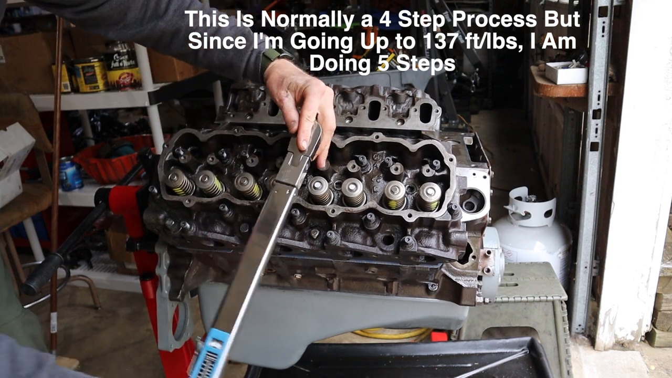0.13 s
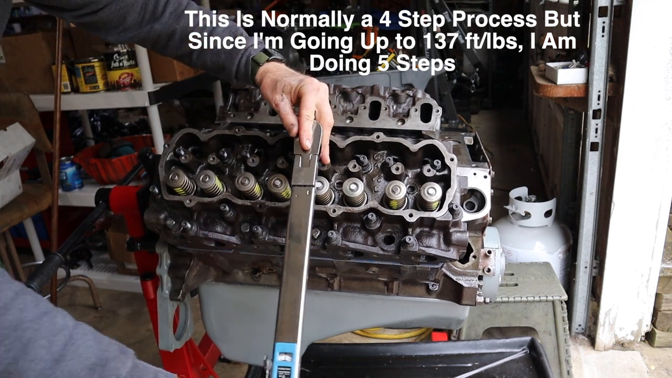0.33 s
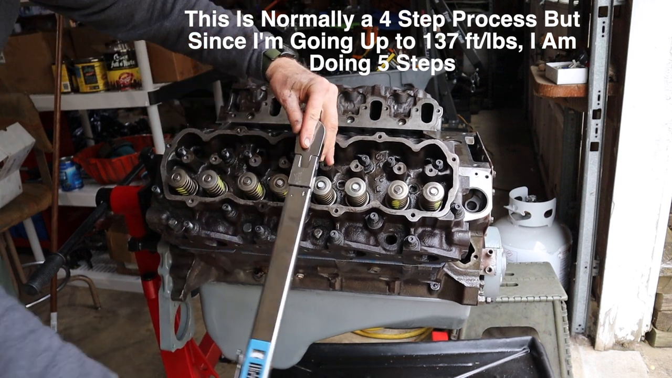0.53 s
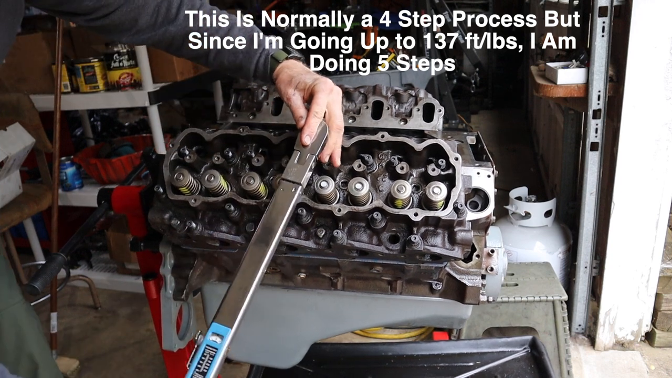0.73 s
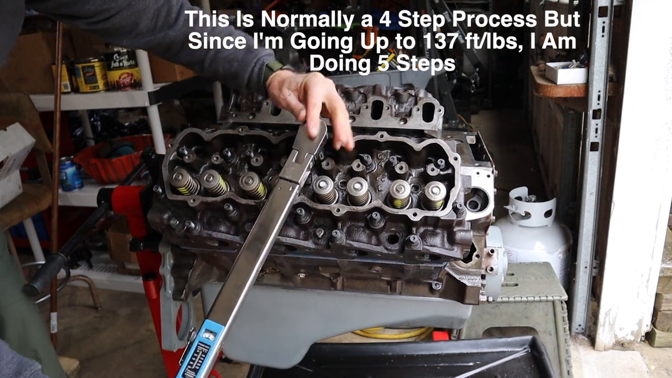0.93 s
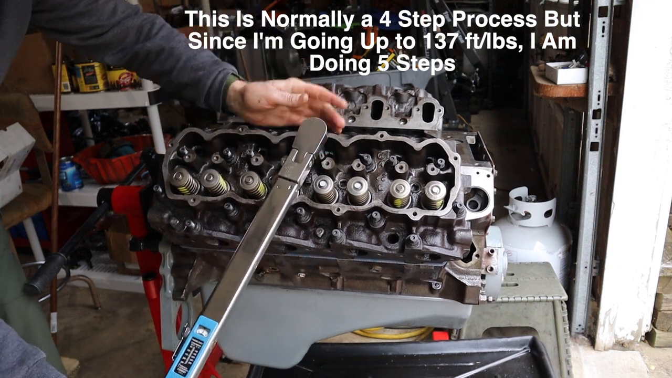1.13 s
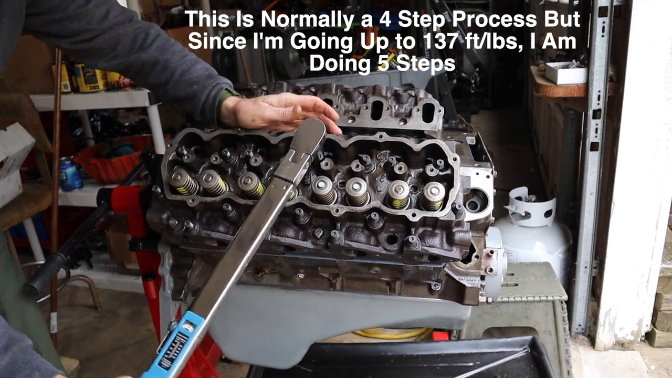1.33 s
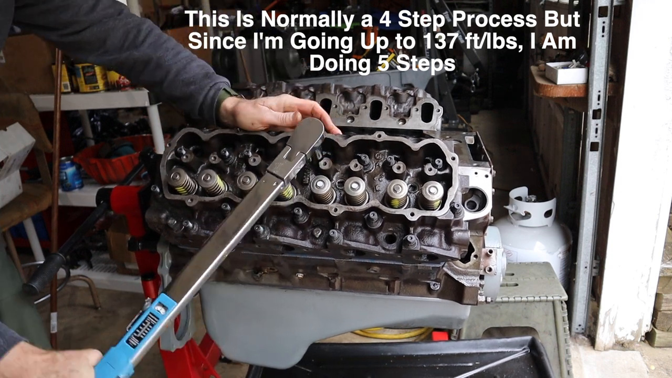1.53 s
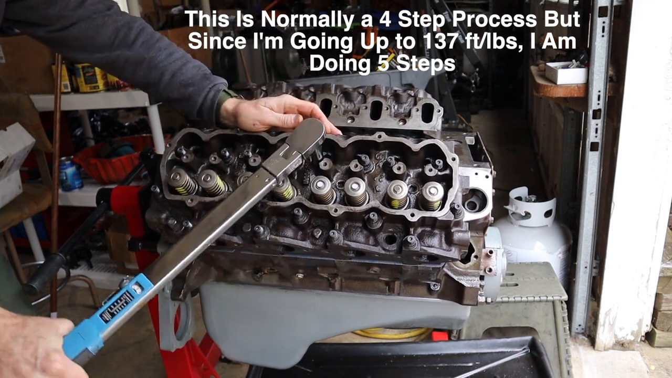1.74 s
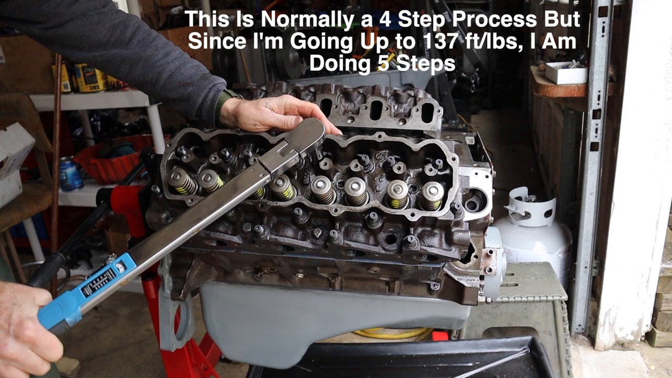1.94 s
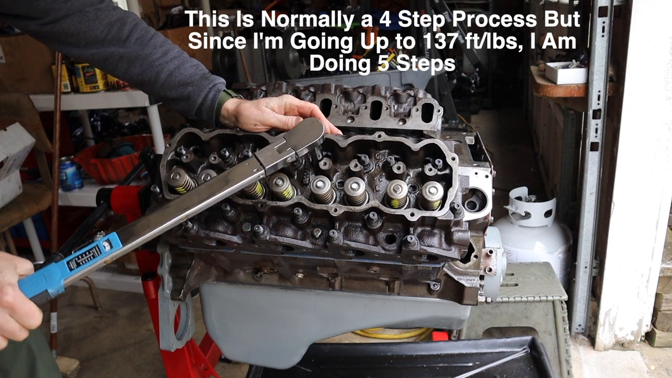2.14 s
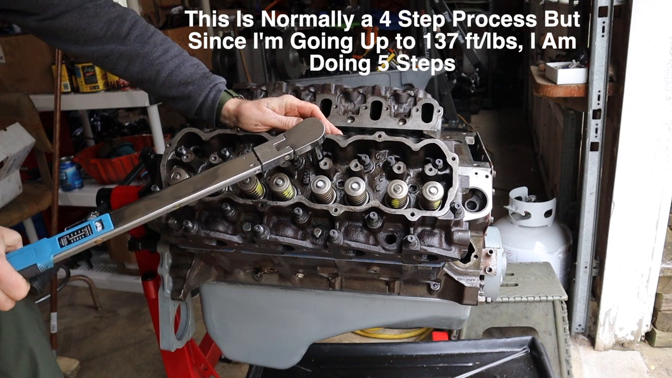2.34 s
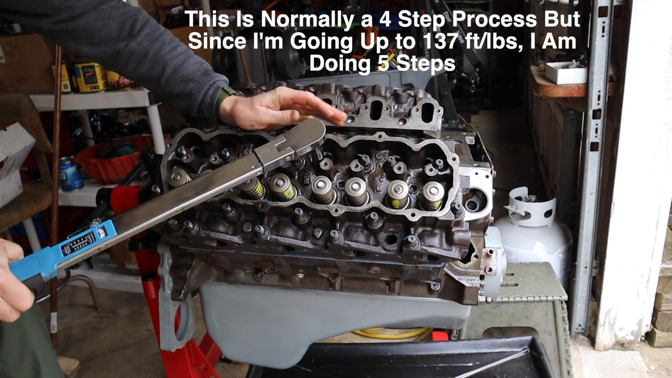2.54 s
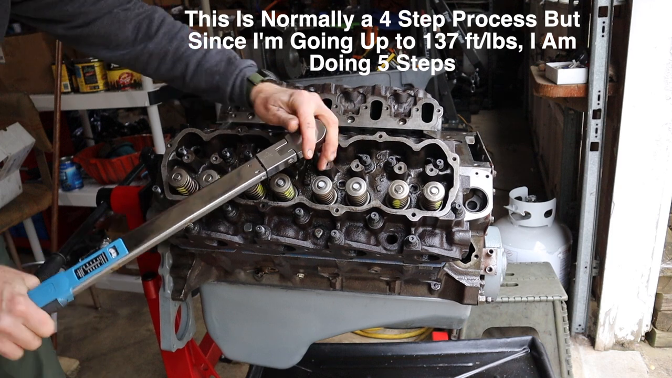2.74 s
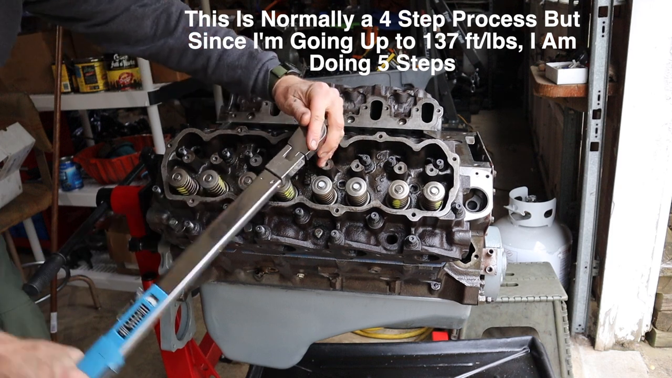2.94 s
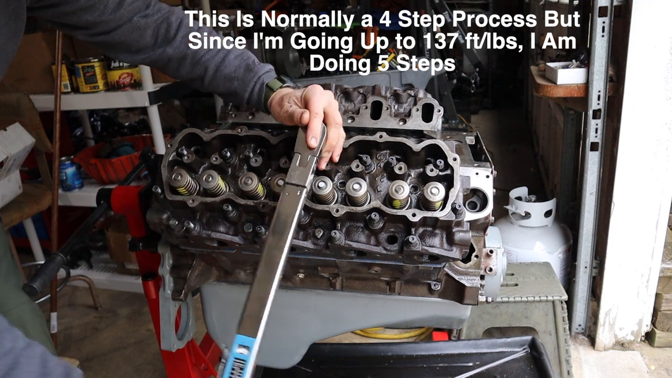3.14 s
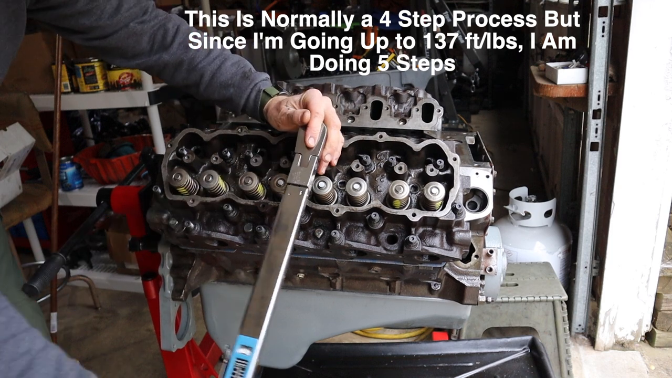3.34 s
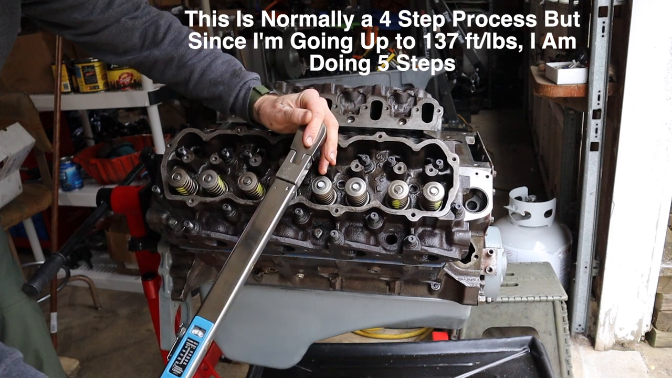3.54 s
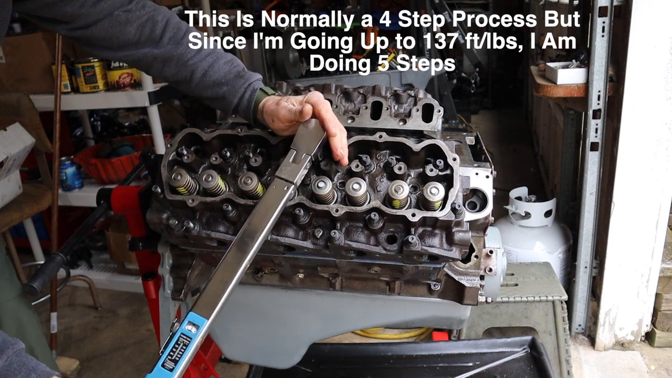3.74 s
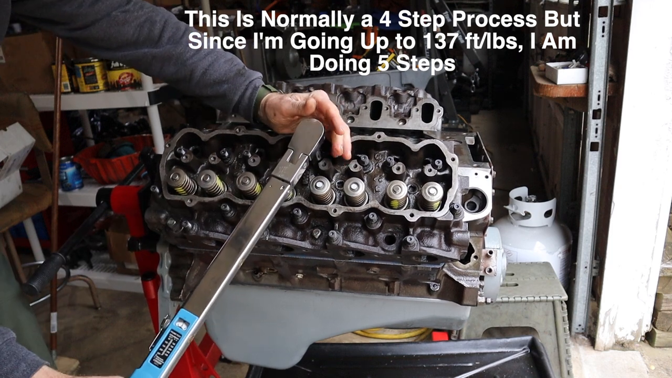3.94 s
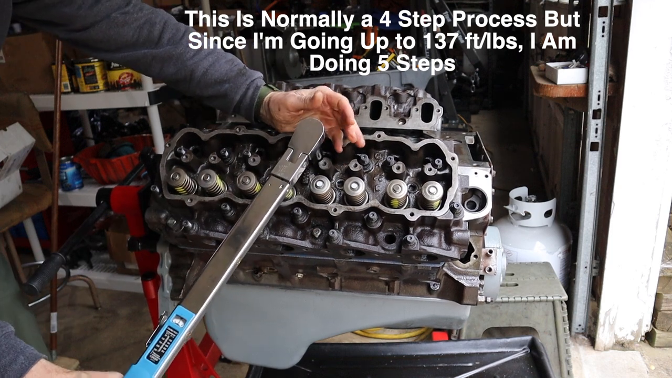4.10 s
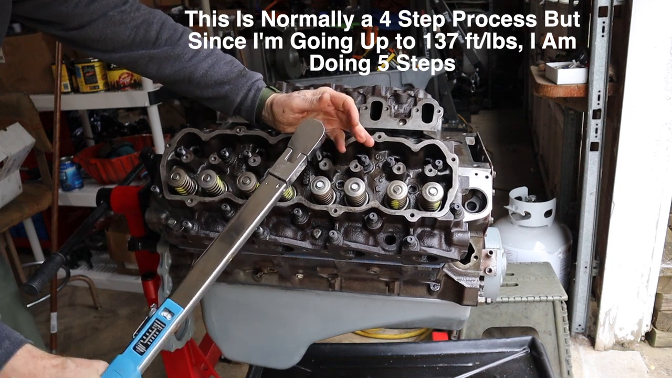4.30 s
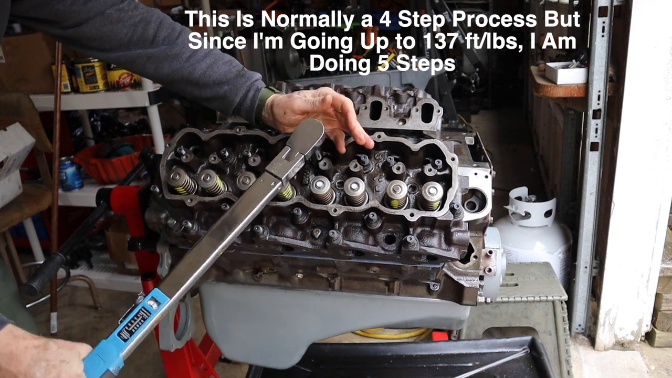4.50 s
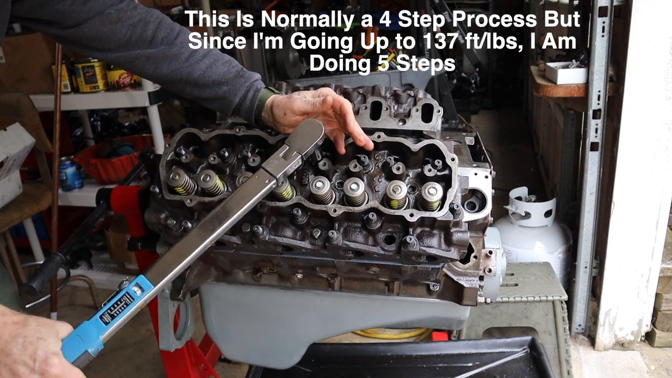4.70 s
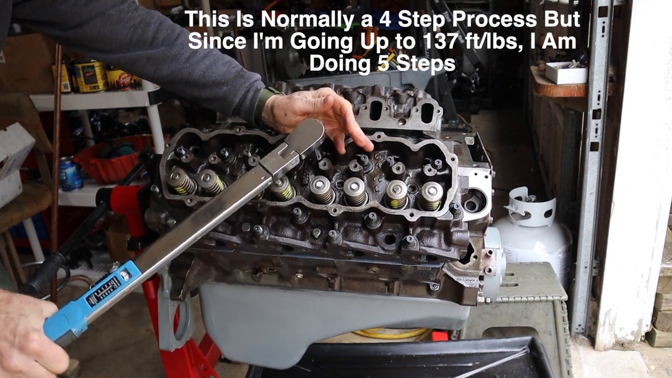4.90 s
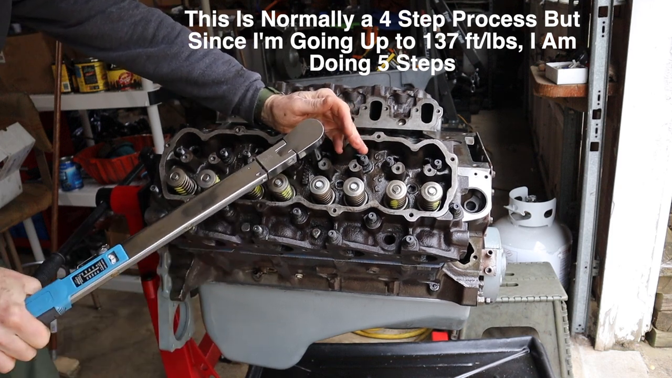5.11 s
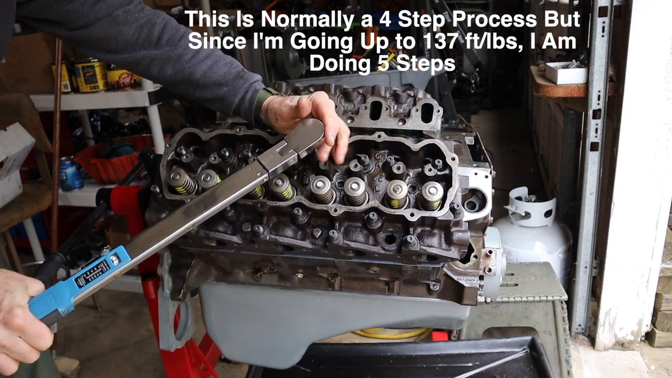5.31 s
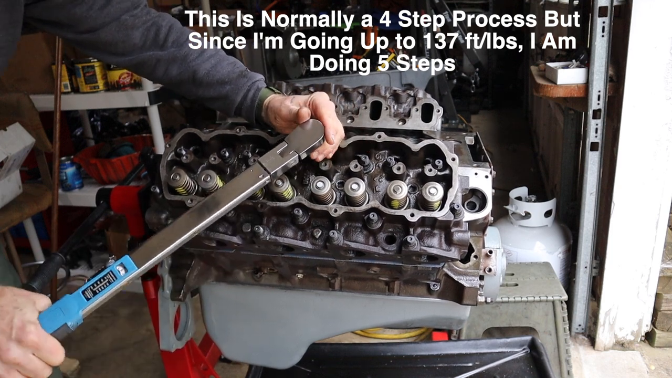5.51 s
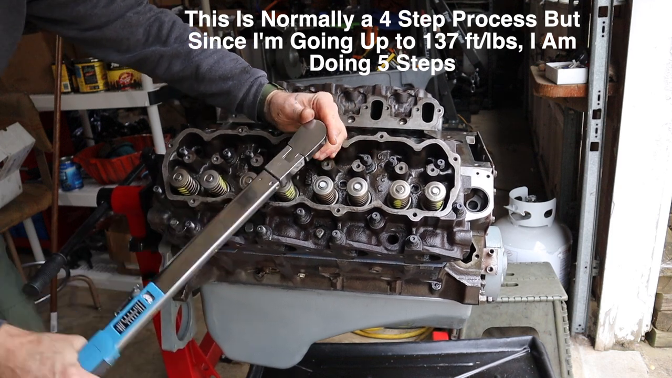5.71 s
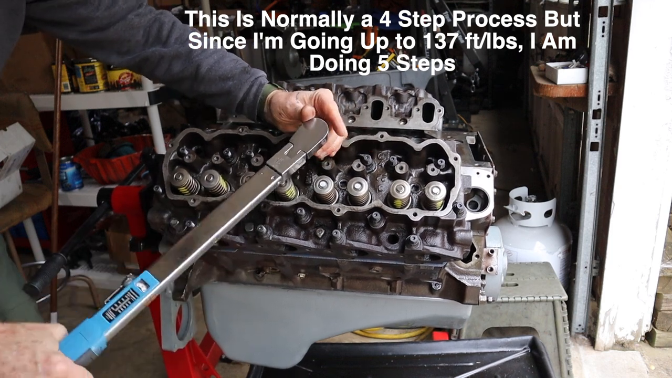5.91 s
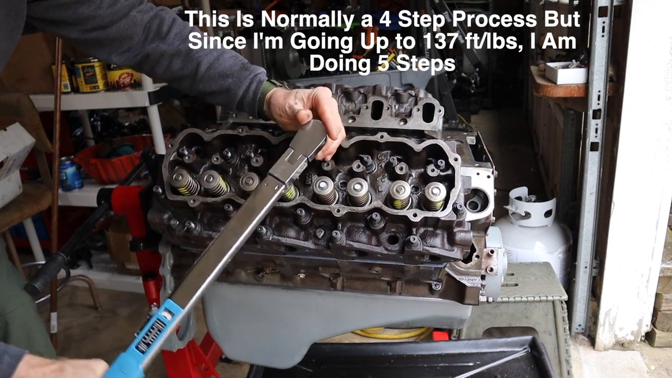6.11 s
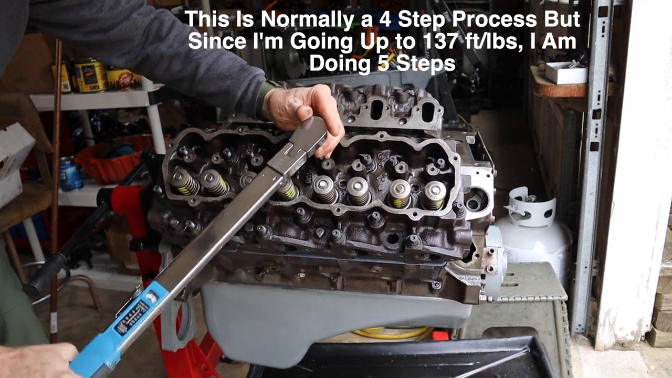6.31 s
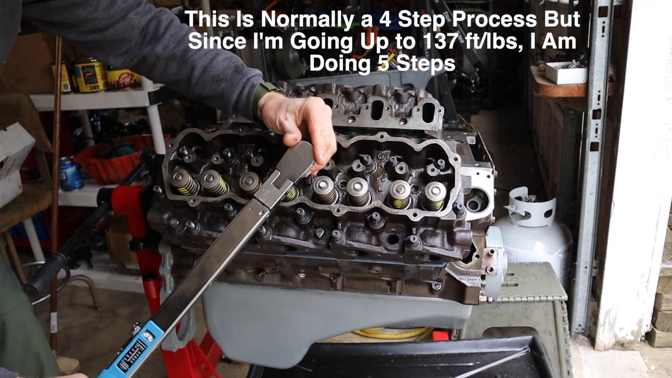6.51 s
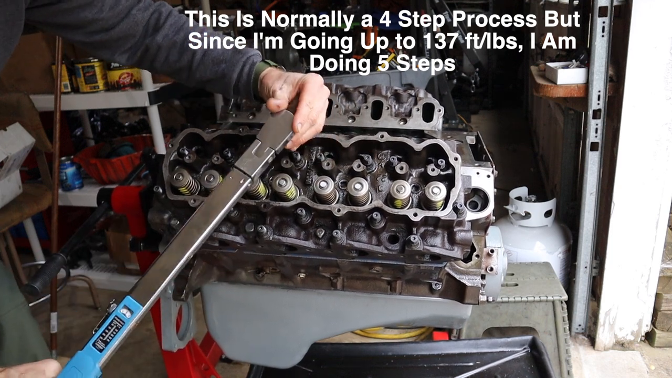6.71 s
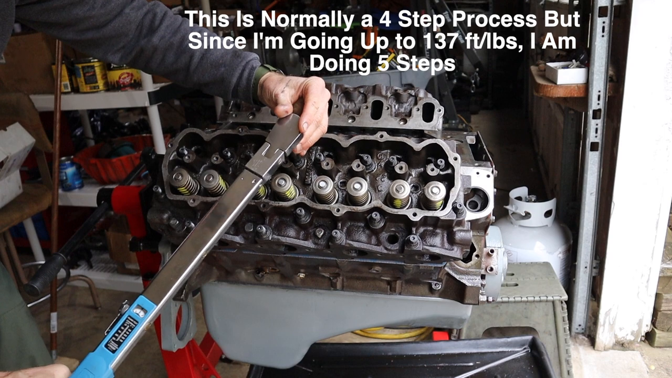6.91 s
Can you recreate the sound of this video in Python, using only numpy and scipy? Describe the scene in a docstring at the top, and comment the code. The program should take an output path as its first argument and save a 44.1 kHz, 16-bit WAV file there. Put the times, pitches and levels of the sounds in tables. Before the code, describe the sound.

Distant traffic rumbles and hums steadily outside an open garage. Right from the start, close to the microphone, the ratchet and socket of a torque wrench tick and clack unevenly on engine nuts, steel on steel, until about 0.8 seconds. A hand and sleeve scuff softly around 1 second. In the pause, very faint birds whistle a little to the left, continuing on and off until about 5 seconds. A second run of sharp ticks comes from 2.8 to 3.7 seconds. At about 5 seconds the wrench gives way with one loud, ringing snap, with a low knock from the engine block and a short echo in the garage; the overall level dips for an instant. From 5.6 to 6.6 seconds a last, denser flurry of ticks and clacks follows, slightly to the left, leaving only the traffic.

```python
"""Distant traffic rumbles and hums outside an open garage. From the start, the ratchet and socket of a
click-type torque wrench tick and clack on engine nuts, steel on steel. Faint birds begin to whistle,
a hand and sleeve scuff softly, and more ticks come near 3 s. At about 5 s the wrench head breaks over
(gives way) with a loud, ringing snap that jolts the engine block and makes the gain control turn
everything down for a moment. A last flurry of ticks follows."""
import sys
import numpy as np
from scipy import signal
from scipy.fft import rfft, irfft, next_fast_len
from scipy.io import wavfile
from scipy.ndimage import uniform_filter1d

SR = 44100
rng = np.random.default_rng(int(sys.argv[2]) if len(sys.argv) > 2 else 0)


def digitize_waveform(pressure):
    """Quantize a signal to 16-bit integers and store it at the path in sys.argv[1].

    Rows of a 2-D input are taken as channels; values are limited to [-1, 1].
    """
    field = np.atleast_2d(pressure).T
    bounded = np.clip(field, -1, 1)
    quanta = np.round(bounded * 32767).astype(np.int16)
    wavfile.write(sys.argv[1], SR, quanta)


N = 306495
ONSET = 48  # samples in which a blow builds up
SIDES = np.array([[.5], [-.5]])  # splits a difference between left and right


def gain_of(db):
    """Turns decibels into a number to multiply by."""
    return 10 ** (np.asarray(db) / 20)


def evened(x):
    """Scales a signal to an average power of 1."""
    return x / np.sqrt(np.mean(x ** 2) + 1e-20)


def look_up(table, hz):
    """Reads between the rows of a table, on a scale of octaves."""
    row_hz, value = np.transpose(table)
    return np.interp(np.log(hz + 1), np.log(row_hz + 1), value)


def add(mix, start_s, sound):
    """Mixes a sound in at the given time."""
    part = mix[..., max(round(start_s * SR), 0):][..., :sound.shape[-1]]
    part += sound[..., :part.shape[-1]]


# How alike far sound is on the left and right: (frequency [Hz], likeness [-1 to 1])
LIKENESS = [(60, 0.98), (150, 1), (380, 0.79), (950, 0.19), (2380, -0.36), (5980, -0.63), (15000, -0.85)]
def spread(left, other, hz):
    """Blends two noises into far-off stereo: alike in the bass, nearly opposite in the high treble."""
    alike = np.clip(look_up(LIKENESS, hz), -1, 1)
    return np.array([left, alike * left + np.sqrt(1 - alike ** 2) * other])


# Tone of the street noise: (frequency [Hz], relative level [dB])
STREET_TONE = [(12, -33.5), (20, -28.5), (64, 0.5), (106, -5.5), (148, -4.5), (213, -3), (324, -9.5),
               (380, -14), (705, -18.5), (1300, -26), (2100, -33), (3300, -36.5), (5230, -45.5),
               (11700, -54.5), (13500, -60.5), (15500, -91)]
# How the street swells and fades: (time [s], rumble [dB], deep rumble [dB], roar [dB])
STREET_LEVELS = [(0.0, -42, -39.5, -31), (0.45, -37, -42, -35.5), (1.05, -35, -34.5, -32.5),
                 (1.7, -37.5, -36.5, -36), (2.3, -35.5, -38.5, -35), (3.2, -34.5, -38.5, -32.5),
                 (3.75, -33.5, -32.5, -31), (4.2, -35, -38.5, -36), (4.9, -35.5, -34.5, -35.5),
                 (5.299, -39.5, -37, -37.5), (6.95, -39.5, -34.5, -37)]
def traffic():
    """Distant traffic blurs into noise, with three bands that swell separately."""
    frames, hz = N // 256 + 5, np.fft.rfftfreq(1024, 1 / SR)[:, None]
    t = np.arange(frames) * 256 / SR
    noise = rng.standard_normal((frames, 513, 5)).T
    patches = uniform_filter1d(noise[4], size=10, axis=0)  # slightly louder and softer spots
    patches = evened(uniform_filter1d(patches, size=14, axis=1))
    times, *levels = np.transpose(STREET_LEVELS)
    rumble_db, deep_db, roar_db = (np.interp(t, times, db) for db in levels)
    roar = np.clip(np.log2(hz / 350 + 0.00089), 0, 1)
    deep = np.clip(np.log2(130 / (hz + 1)) * 2, 0, 1)
    level_db = 0.61 * patches + (1 - roar - deep) * rumble_db + deep * deep_db + roar * roar_db
    tone = gain_of(look_up(STREET_TONE, hz))
    # keeps the street's tone the same when left and right are added together
    tone /= np.linalg.norm(tone) * np.sqrt(np.clip(1 + look_up(LIKENESS, hz), .1, 2))
    spectra = spread(noise[0] + 1j * noise[1], noise[2] + 1j * noise[3], hz)
    return signal.istft(spectra * tone * gain_of(level_db), nperseg=1024, noverlap=768)[1][:, :N]


def fuzzy_tone(length_s, start_hz, end_hz, db, width_hz, purity, waver=0):
    """A gliding pure tone wrapped in a narrow band of noise."""
    size = round(length_s * SR)
    wander = evened(uniform_filter1d(rng.standard_normal(2 * SR), size=1500))[:size]
    cycles = np.cumsum(np.linspace(start_hz, end_hz, size) * (1 + waver * wander)) / SR
    spin, pole = np.exp(2j * np.pi * cycles), np.exp(-np.pi * width_hz / SR)
    # shift the pitch down to zero, smooth twice, shift back: only noise near the pitch is left
    shifted = rng.standard_normal(2 * SR)[:size] * spin.conj()
    fuzz = evened((spin * signal.lfilter([1], [1, -2 * pole, pole ** 2], shifted)).real)
    core = np.sin(2 * np.pi * (cycles + rng.random()))
    return gain_of(db) * evened(fuzz + purity * core) * signal.windows.tukey(size, .3)


# Far engines going by: (start [s], length [s], pitch [Hz], level [dB])
ENGINES = [(0.0, 0.83, 134.8, -52), (0.549, 0.97, 165.7, -45), (2.099, 1.46, 158.5, -42.5),
           (3.196, 1.5, 147.1, -51), (5.2, 0.99, 120.2, -49)]
# The tones in each hum: (multiple of the pitch [ratio], relative level [dB])
HUM_TONES = [(.51, -7), (0.822, -25), (.91, -12.5), (0.999, -2), (1.43, -13.5), (1.75, -12.5), (1.979, -7)]
def engine_hum(sag_per_s=0.0446):
    """Each engine hums, its pitch sinking as it draws away."""
    out = np.zeros(N)
    for start, length, hz, level_db in ENGINES:
        for multiple, db in HUM_TONES:
            start_hz = multiple * hz
            end_hz = start_hz * (1 - sag_per_s * length)
            add(out, start, fuzzy_tone(length, start_hz, end_hz, level_db + db, width_hz=3.9, purity=4))
    return out


# Ringing tones of the wrench bar and socket: (pitch [Hz], level [dB], time to fade 60 dB [s])
BAR_TONES = [(858, -1, 0.95), (1710, -11, 0.32), (1745, -18.5, .2), (2215, -2, 0.21), (2650, -4.5, 0.18),
             (3040, -13, 0.25), (3120, -11, 0.31), (3580, -14, 0.12), (3806, -14.5, 0.33), (4380, -10, .35),
             (4923, -9, .35), (4965, -6, 0.42), (5055, -9, 0.3), (5150, -9, .4), (5290, -6, 0.15),
             (5780, -4, 0.17), (5950, -11.5, 0.18), (6230, -11.5, 0.28), (7230, -14, 0.3), (7400, -7, .35),
             (8640, -10, .3), (9840, -9, 0.3), (9740, -11.5, .25), (10450, -9, .25), (11250, -8.5, 0.31)]
def bar_ring(chatter=1.3):
    """The bar rings at its own pitches, one per row; loose joints make each one flutter."""
    t = np.arange(SR // 2) / SR
    hz, db, fade_s = np.transpose(BAR_TONES)[..., None]
    drift = uniform_filter1d(rng.standard_normal((2, len(BAR_TONES), len(t))), size=300)
    flutter = (1 + chatter * (evened(drift[0]) + 1j * evened(drift[1])) / np.sqrt(2)) / np.hypot(1, chatter)
    tones = gain_of(db - 60 * t / fade_s) * (flutter * np.exp(2j * np.pi * hz * t)).imag
    return tones * np.minimum(t / .0012, 1) * np.cos(np.pi * t / t[-1] / 2)  # soft start and end


def crack_and_rattle(t, fade_s):
    """Steel meets steel sharply, then loose parts bounce, duller and unevenly."""
    noise = rng.standard_normal((4, len(t)))
    crack = 1.71 * noise[0] * gain_of(-60 * t / 0.0049)
    rattle = noise[0] + 0.96 * noise[1:3]  # scatters differently to each side
    rattle = signal.sosfilt(signal.butter(3, 9300, fs=SR, output="sos"), rattle)
    lumps_db = 2.5 * evened(uniform_filter1d(noise[3], size=90)) * np.minimum(t / 0.0082, 1)
    fade_db = -60 * (t / fade_s) ** 1.158  # holds briefly, then drops
    return crack + 0.61 * rattle * gain_of(lumps_db + fade_db)


# Tone of a medium blow: (frequency [Hz], level [dB], share of heft [ratio], share of sparkle [ratio])
STEEL_TONE = [(250, -22, 0.34, 0.081), (433, -10, 0.81, 0.58), (740, -7, 1, 0), (1920, -3, 0.85, 0.14),
              (3720, -3, 0.12, 0.17), (4600, -7, 0, 0.47), (5050, -0.5, 0.28, 0.067),
              (6740, -5.5, 0.39, 0.55), (10870, -10.5, 0.23, 1.1), (14100, -27, 0, 1.3),
              (16400, -36, 0.42, 0.92)]
def steel_blow(tones, level_db, pitch_hz, heft_db, sparkle_db, rattle_s, focus, ring_db, pan_db, buzz_db):
    """One hit rattles and rings the bar. Heft adds body, sparkle adds treble, focus adds a ping."""
    tilt_db = 0.43 * (level_db + 11)  # per octave above 8 kHz: quiet ticks are heard with less top treble
    curve = [(hz, db + low * heft_db + high * sparkle_db + tilt_db * max(np.log2(hz / 8000), 0))
             for hz, db, low, high in STEEL_TONE]

    def colour(hz, width):
        """The parts that meet favour one pitch region."""
        ping_db = 7.5 * focus * np.exp(-(np.log((hz + 1) / pitch_hz) / width) ** 2)
        return gain_of(look_up(curve, hz) + ping_db)

    t, hz = np.arange(4096) / SR, np.fft.rfftfreq(4096, 1 / SR)
    bar_hz = np.transpose(BAR_TONES)[0]
    buzz = gain_of(buzz_db * np.exp(-((hz - bar_hz[:, None]) / 70) ** 2).max(0))  # lift at the bar's tones
    burst = irfft(rfft(crack_and_rattle(t, rattle_s)) * buzz * colour(hz, width=.055))
    burst = np.roll(burst, ONSET, axis=1)
    burst[:, :ONSET] *= np.hanning(2 * ONSET)[:ONSET]
    burst *= np.clip((t[-512] - t) / .05, 0, 1)
    spot_db = 2.5 * rng.standard_normal(len(bar_hz))  # each blow lands somewhere else
    ring = gain_of(ring_db + spot_db) * colour(bar_hz, width=.03) @ tones
    sound = np.tile(np.roll(ring, ONSET), (2, 1))
    add(sound, 0, 1.089 * burst)
    return gain_of(level_db + SIDES * pan_db) * sound


# Where the wrench is heard: (time [s], left over right [dB])
WRENCH_SIDE = [(0.3, -1), (3.2, 0), (5.06, 1.5), (5.9, 4), (6.5, 1)]
def side_db(time_s):
    """How much louder the wrench is on the left at this moment."""
    return np.interp(time_s, *np.transpose(WRENCH_SIDE))


# Ticks and clacks of steel on steel:
# (time [s], level [dB], pitch [Hz], heft [dB], sparkle [dB], rattle length [s], focus [0 = no ping])
RATCHET_HITS = [(0.0014, -25, 870, 7.5, -2, 0.3, 1.4), (0.029, -15.5, 5850, -6, 10, 0.048, 0.96),
                (0.0347, -12, 5940, -2, -11, 0.043, 2.57), (0.0655, -22.5, 1880, 8, -11, 0.093, 2.23),
                (0.1925, -14, 4600, -20.5, 15.5, 0.043, .9), (0.226, -28, 5000, -21, 5, 0.056, 0.87),
                (0.3234, -9.5, 3540, -11.5, 9, 0.041, 0.82), (0.5032, -30.5, 1370, 7.5, 0, 0.083, 1.9),
                (0.513, -33.5, 5060, -1, 7, 0.036, .9), (0.552, -8, 1500, 3.5, 8, 0.042, 0.52),
                (0.574, -18.5, 5270, 7.5, 9, 0.059, 0.8), (0.7078, -30.5, 1880, 6, -5, 0.047, 1.3),
                (0.7943, -21, 1670, 3, -3, 0.052, 0.45), (2.7942, -18.5, 2150, 1, 5.5, 0.061, 1.3),
                (2.8635, -31, 744, 16, -9, 0.061, 2.16), (2.8714, -23, 2040, -15, -5, 0.047, .6),
                (3.0516, -13, 4900, -9.5, 14, 0.047, 0.63), (3.1363, -13.5, 4940, -10, 16, 0.043, 1.36),
                (3.251, -18.5, 5360, -6, 23.5, 0.052, 2.1), (3.3951, -26, 1440, 4, 3, 0.073, 0.76),
                (3.456, -22.5, 3140, -2, -12, 0.07, .6), (3.4674, -24, 5070, 2, -18, 0.045, 1.4),
                (3.48, -16, 2160, 2.5, -2.5, 0.086, 0.33), (3.4929, -24, 2950, 2, 1, 0.066, 1.5),
                (3.534, -31.5, 5500, -6, 11, 0.046, .8), (3.546, -37.5, 1860, 6, 5, .05, .6),
                (3.6633, -23.5, 2980, -6.5, 2.5, 0.063, 1.5), (5.034, -48, 11500, -12.5, 13, 0.033, .6),
                (5.5829, -26.5, 6650, 1, 20.5, 0.046, 1), (5.7054, -22, 1910, 2.5, -3, 0.055, 0.43),
                (5.8496, -10.5, 2170, 2.5, 10.5, 0.052, 0.43), (5.9176, -23, 1500, -1.5, -4, 0.06, 0.37),
                (5.925, -24, 5000, -8, 5, .05, 0.87), (5.9655, -32, 2110, -9, 16, .05, .6),
                (6.02, -35.5, 1500, 7.5, -13, 0.026, .5), (6.036, -17.5, 1400, 0.5, 11.5, 0.018, 0.66),
                (6.041, -10.5, 5100, -1.5, 1, 0.088, 1.8), (6.068, -12, 5330, 0.5, 8.5, 0.058, 1.3),
                (6.0848, -9.5, 5400, 1, 7, 0.068, 0.48), (6.175, -5, 5730, -2.5, 2.5, 0.059, 1.56),
                (6.215, -23, 1220, 3.5, 10, 0.049, 0.42), (6.2883, -20, 1790, 2.5, 7.5, 0.073, .6),
                (6.2967, -14, 2085, 2, 0.5, 0.042, 1.8), (6.323, -21, 2200, -11, 4, 0.061, 0.76),
                (6.3751, -22, 1790, 7, -8, 0.022, 0.77), (6.3897, -18, 1420, 2, 6, 0.045, 0.82),
                (6.4087, -14, 2430, 1, 9, 0.079, 1.6), (6.4202, -16, 2850, 10, -1, 0.084, 1),
                (6.459, -8.5, 2200, -4, 2.5, 0.059, 1), (6.6274, -20, 3000, 5, 8.5, 0.042, 1.1)]
def ratchet_ticks(tones, grip_fade_s=.1):
    """Ratchet and socket tick while the hand on the head cuts their ringing short."""
    out = np.zeros((2, N + ONSET))
    held = tones * gain_of(-60 * np.arange(tones.shape[1]) / SR / grip_fade_s)
    for time_s, *blow in RATCHET_HITS:
        add(out, time_s, steel_blow(held, *blow, ring_db=-23.5, pan_db=side_db(time_s), buzz_db=0))
    return out[:, ONSET:]


# Tones of the engine block: (pitch [Hz], level [dB], time to fade 60 dB [s], left over right [dB])
BLOCK_TONES = [(290, -17.5, 0.029, 13.5), (575, -10, 0.031, -10), (1004, -5.5, 0.033, -5),
               (1240, -14, .03, -0.5), (1490, -14.5, .03, 4.5)]
def block_knocks(snap_s):
    """The engine block gives a short knock under hefty ticks and under the snap."""
    out, t = np.zeros((2, N)), np.arange(4096) / SR
    tones = np.array([gain_of(db + SIDES * pan_db - 60 * t / fade_s) * np.sin(2 * np.pi * hz * t)
                      for hz, db, fade_s, pan_db in BLOCK_TONES])
    for time_s, level_db, _, heft_db, *_ in RATCHET_HITS:
        strengths = gain_of(level_db + heft_db - 13 + 4.6 * rng.standard_normal(len(tones)))
        add(out, time_s, np.tensordot(strengths, tones, axes=1) * np.minimum(t / 0.0017, 1))
    add(out, snap_s, tones.sum(0))
    return out


# How long the garage echoes: (frequency [Hz], time to fade 60 dB [s])
ECHO_FADES = [(500, 0.42), (1500, 0.48), (4000, 0.43), (8000, 0.4), (13000, 0.23)]
def garage_echo(x):
    """Sound bounces between the walls; two echo tails crossfade, so ticks echo slightly differently."""
    out, crossfade = 0, np.pi * np.arange(N) / SR / .23
    for share in (np.cos(crossfade), np.sin(crossfade)):
        hz, t, noise = signal.stft(rng.standard_normal((2, SR)), SR, nperseg=256)
        spectra = spread(*noise, hz[:, None]) * gain_of(-60 * t / look_up(ECHO_FADES, hz)[:, None])
        tail = signal.istft(spectra, SR, nperseg=256)[1]
        tail *= np.minimum(np.arange(tail.shape[1]) / SR / 0.0032, 1)  # walls answer after a few ms
        out = out + signal.fftconvolve(share * x[None], tail / np.linalg.norm(tail[0]), axes=1)[:, :N]
    return out


# Bird whistles: (start [s], length [s], start pitch [Hz], end pitch [Hz], level [dB])
BIRD_NOTES = [(0.372, 0.15, 2600, 2640, -61), (1.318, 0.32, 2790, 2660, -64.5),
              (1.602, 0.6, 2564, 2573, -61), (2.043, .7, 2606, 2560, -63), (1.518, 0.14, 3260, 3340, -66.5),
              (1.77, 0.11, 3680, 3620, -67), (1.77, 0.038, 2980, 3150, -62), (1.995, 0.19, 3670, 3640, -65),
              (2.08, 0.21, 3320, 3330, -67), (2.352, 0.11, 3390, 3330, -63.5),
              (2.411, 0.1, 2510, 2410, -58), (2.565, 0.092, 3370, 3250, -62), (2.6, .08, 3650, 3680, -66),
              (2.693, 0.09, 4000, 3680, -65), (3.69, 0.24, 1910, 1800, -57.5),
              (3.81, 0.11, 2370, 2640, -60), (4.154, 0.11, 3640, 4130, -64),
              (4.262, 0.093, 3010, 3100, -65), (4.28, 0.26, 3370, 3410, -64),
              (4.49, 0.12, 2500, 2440, -62.5), (4.58, 0.26, 2780, 3030, -65),
              (4.853, 0.23, 3730, 4000, -64)]
def birds():
    """Faint birds whistle gliding, wavering notes, off to the left."""
    out = np.zeros(N)
    for start, *note in BIRD_NOTES:
        add(out, start, fuzzy_tone(*note, width_hz=120, purity=1, waver=0.008))
    return out * np.array([[1.05], [.5]])


# Soft rubs of hand and sleeve, plus one faint, hissy wrench tick near 6.15 s:
# (middle [s], half length [s], level [dB], brightness [dB per octave])
HISS_SWELLS = [(0.752, 0.075, -59, 6.5), (1.014, 0.18, -52.5, -2), (1.268, 0.025, -49.5, -6.5),
               (3.966, 0.072, -66, 4), (5.581, 0.065, -44, 1.5), (6.149, 0.02, -34, -6),
               (6.89, 0.075, -69, -21.5)]
def scuffs():
    """Brief swells of hiss make the rubs of hand and sleeve, and one faint tick."""
    out, hz = np.zeros((2, N)), np.fft.rfftfreq(16384, 1 / SR)
    band = (hz > 900) / (1 + (hz / 12000) ** 8)
    for middle_s, half_s, db, slope_db in HISS_SWELLS:
        tilt = gain_of(slope_db * np.log2(hz / 4000 + 0.12))
        hiss = evened(irfft(rfft(rng.standard_normal(16384)) * tilt * band))
        swell = np.hanning(round(2 * half_s * SR)) ** 2
        add(out, middle_s - half_s, gain_of(db) * hiss[:len(swell)] * swell)
    return out


# The snap: (level [dB], pitch [Hz], heft [dB], sparkle [dB], rattle length [s], focus [0 = no ping])
SNAP_HIT = (-2, 4989.5, -7.5, 15.5, 0.26, 1.28)
def head_snap(tones, time_s, stand_rattle_s=0.35):
    """The head breaks over and the bar rings freely; the block and its stand rattle on longer."""
    snap, stand = np.zeros((2, 2, N + ONSET))
    *blow, _, focus = SNAP_HIT
    add(snap, time_s, steel_blow(tones, *SNAP_HIT, ring_db=-20, pan_db=side_db(time_s), buzz_db=4))
    add(stand, time_s, steel_blow(tones, *blow, stand_rattle_s, focus, ring_db=-20, pan_db=0, buzz_db=4))
    return snap[:, ONSET:], stand[0, ONSET:]


# Jolt in the block: (level [dB], start pitch [Hz], end pitch [Hz], glide [s], time to fade 60 dB [s])
JOLT = [(4.5, 1150, 115, 0.00065, 0.032)]
def block_thump(time_s):
    """The snap jolts the engine block: a low thump whose pitch drops quickly."""
    db, start_hz, end_hz, glide_s, fade_s = JOLT[0]
    out, t = np.zeros(N), np.arange(4096) / SR
    cycles = end_hz * t + (start_hz - end_hz) * glide_s * (1 - np.exp(-t / glide_s))
    add(out, time_s, gain_of(db - 60 * t / fade_s) * np.sin(2 * np.pi * cycles))
    return out


# How far near sound on the left runs ahead of the right: (frequency [Hz], lead [radians])
LEFT_LEAD = [(300, 6.5), (900, -2), (1500, 0.53), (2500, -1.5), (5000, -1.8), (9000, -2), (15000, -1.5)]
def out_of_step(x):
    """Near sound reaches the two microphone openings out of step."""
    size = next_fast_len(N)
    lead = look_up(LEFT_LEAD, np.fft.rfftfreq(size, 1 / SR))
    return irfft(rfft(x, size) * np.exp(1j * SIDES * lead), size)[:, :N]


def scene():
    """Wrench and hands close by, the garage behind them, the street outside."""
    snap_s, jolt_s = 5.0592, 5.06
    tones = bar_ring()
    ticks = ratchet_ticks(tones)
    snap, stand = head_snap(tones, snap_s)
    near = ticks + snap + scuffs()
    echo = gain_of(-8) * garage_echo(near[0] + gain_of(6.5) * stand)  # the stand is heard only as echo
    block = block_knocks(jolt_s) + block_thump(jolt_s)
    return out_of_step(near) + echo + block + traffic() + engine_hum() + birds()


def record(dry, limit_db=-8, recovery_db_per_s=102, lag_s=0.015, top_hz=16500):
    """Gain control dips the level just after a loud peak; overloads clip; the highest treble is cut."""
    level_db = 10 * np.log10(abs(uniform_filter1d((dry ** 2).mean(0), size=128)) + 1e-12)
    recovery_db = np.arange(N) * recovery_db_per_s / SR
    held_db = np.maximum.accumulate(level_db + recovery_db) - recovery_db  # holds peaks, then lets go
    excess_db = np.maximum(held_db - limit_db, 0)
    lag = np.exp(-1 / (lag_s * SR))
    dip_db = 2.92 * signal.lfilter([1 - lag], [1, -lag], excess_db)
    clipped = np.clip(dry / gain_of(dip_db), -1, 1)
    treble_cut = signal.firwin(511, top_hz, window=("kaiser", 9), fs=SR)
    return signal.oaconvolve(clipped, treble_cut[None], "same")


dry = scene()
out = record(dry)
digitize_waveform(out)
```